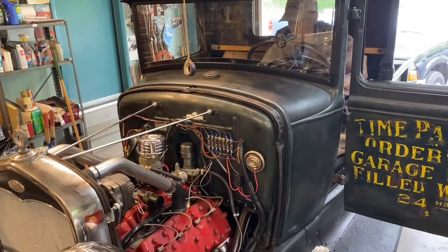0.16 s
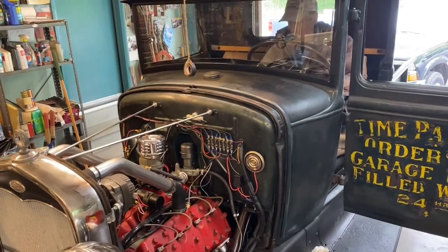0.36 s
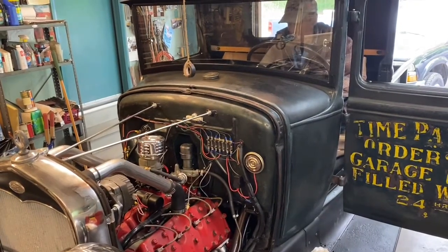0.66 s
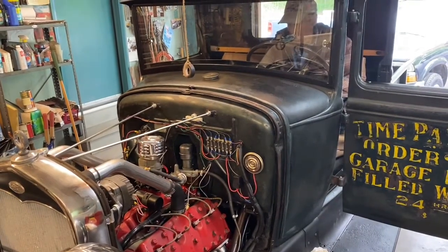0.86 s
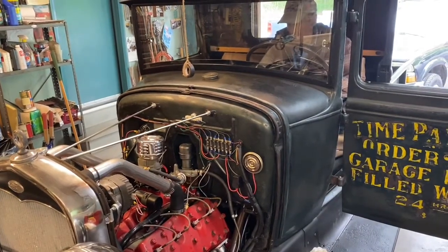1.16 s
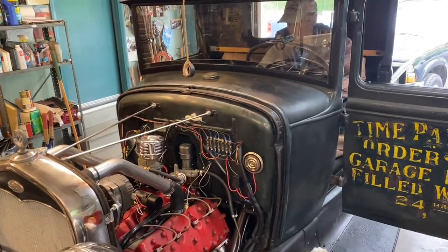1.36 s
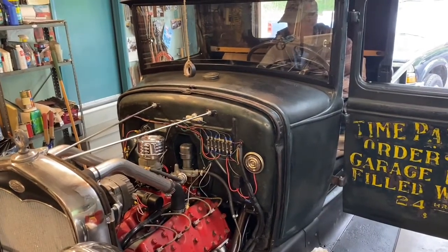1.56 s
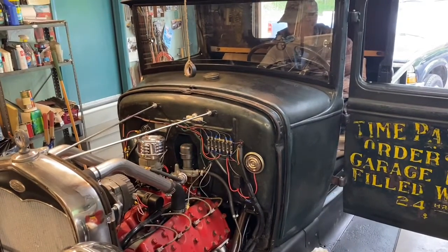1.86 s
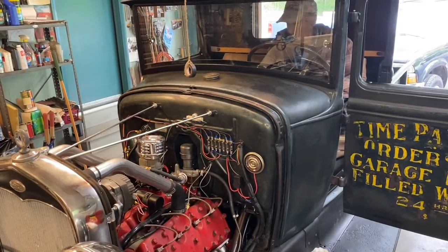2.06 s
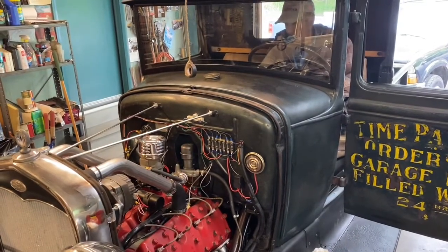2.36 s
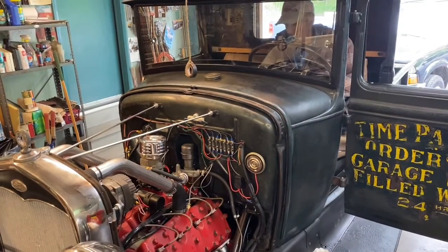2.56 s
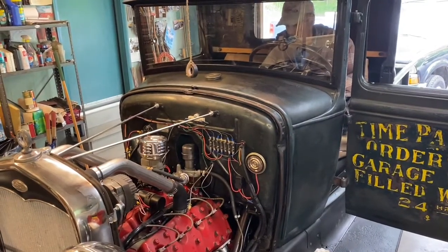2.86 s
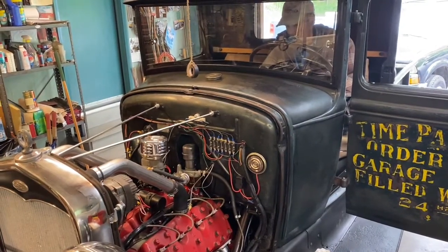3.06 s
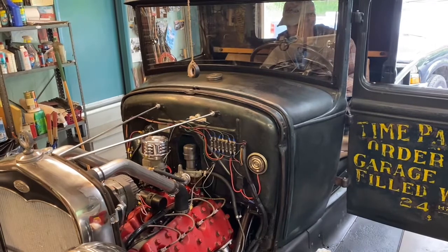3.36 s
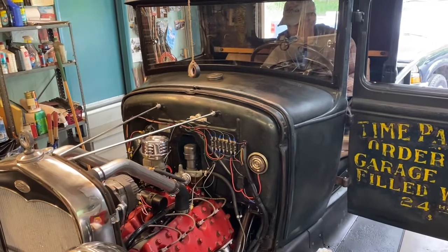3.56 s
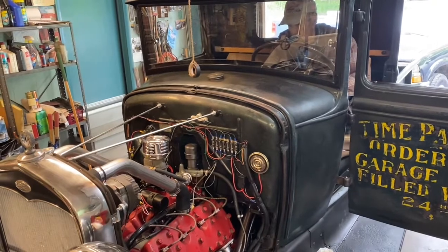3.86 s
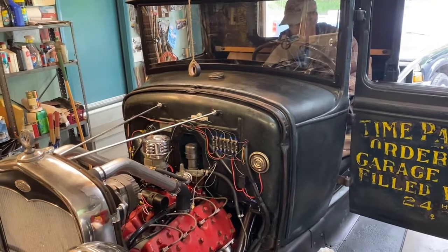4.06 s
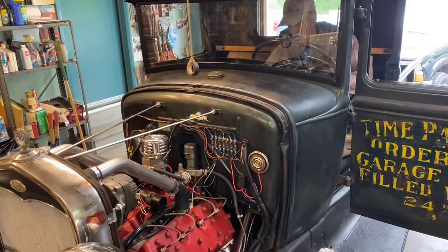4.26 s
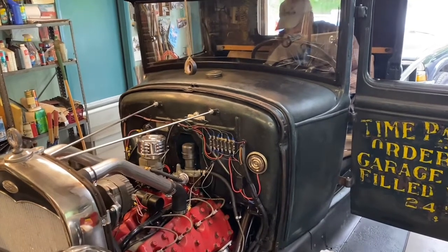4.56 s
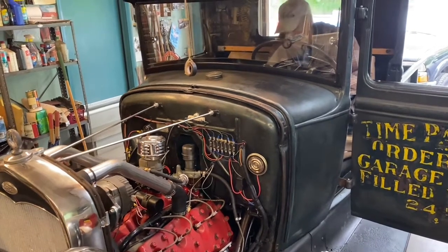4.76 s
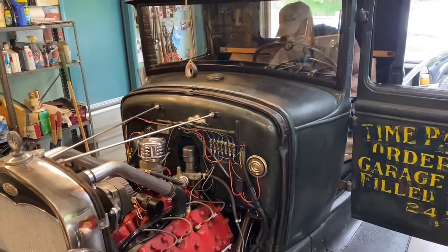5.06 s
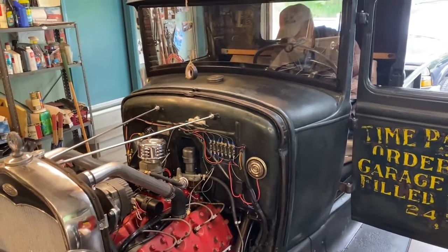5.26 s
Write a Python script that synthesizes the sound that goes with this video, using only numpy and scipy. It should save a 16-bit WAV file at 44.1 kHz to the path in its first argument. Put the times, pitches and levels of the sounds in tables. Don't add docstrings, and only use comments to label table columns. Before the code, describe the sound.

Close stereo pickup in a home garage: faint key ticks and soft pedal thumps over quiet air, then at one and a half seconds a hard starter clunk and brief toothy grinding. An old V8 catches, lurches through slow uneven firings, revs with a throaty exhaust and hissing intake, then drops to a lumpy idle with light metallic clatter.

```python
import sys
import numpy as np
from scipy import signal
from scipy.fft import rfft, irfft, next_fast_len
from scipy.io import wavfile
from scipy.ndimage import uniform_filter1d, map_coordinates

SR = 44100
rng = np.random.default_rng(int(sys.argv[2]) if len(sys.argv) > 2 else 0)


def boost_factor(decibels):
    exponent = np.asarray(decibels, float) / 20
    return 10 ** exponent


def unload_wav(signal):
    wavfile.write(
        sys.argv[1],
        SR,
        np.round(np.clip(np.atleast_2d(signal).T, -1, 1) * 32767).astype(np.int16),
    )


N = 238250
TIME = np.arange(N) / SR

# pitch_hz, level_db (per Hz)
STILL_AIR = [(15, -40), (25, -36), (54, 2), (323, -21), (364, -4.5), (392, -38), (868, -23), (980, -20.5),
             (3610, -48), (3880, -64), (4590, -27.5), (5180, -61), (8000, -60), (10400, -95), (17600, -120)]
# pitch_hz, width_hz, level_db
MACHINE_HUM = [(356, 2.8, -75), (4680, 250, -78)]
# start_s, peak_db, pitch_hz, fade_s (time to fall 60 dB)
KEY_TICKS = [(0.156, -62, 2040, 0.18), (0.1875, -56, 2190, 0.17), (0.2867, -57.5, 2160, 0.19),
             (0.3606, -50, 2290, 0.14), (0.3914, -67, 2190, 0.3), (0.4144, -60, 2180, 0.22)]
# time_s, rumble_db, linkage_rustle_db
PEDAL_MOVES = [(0.12, -78, -89), (0.202, -63, -72), (0.276, -54, -81), (0.284, -66, -76), (0.352, -59, -82),
               (0.36, -55, -59), (0.39, -53, -75), (0.488, -62, -104), (0.562, -58, -92), (0.582, -81, -87),
               (0.65, -63, -86), (0.758, -70, -88), (0.788, -57, -53.5), (0.818, -39, -46.5),
               (0.872, -48, -57.5), (1.07, -50, -60), (1.146, -58, -80), (1.198, -59, -61.5),
               (1.454, -81, -84), (1.47, -76, -61)]
# start_s, peak_db, pitch_hz, fade_s
METAL_CLICKS = [(0.7836, -40.5, 5140, 0.27), (1.1815, -35, 7100, 0.25), (1.486, -36, 5600, 0.067),
                (1.5314, -17.5, 6420, 0.15), (1.7186, -15, 5480, 0.063), (1.7604, -18, 4850, 0.09),
                (1.8407, -19, 6270, 0.1), (1.9108, -18, 7200, 0.12), (1.9612, -14, 5070, 0.052),
                (1.985, -19.5, 6080, 0.18), (2.0855, -10, 5350, 0.068), (2.124, -18, 6800, 0.098),
                (2.493, -28, 4680, 0.09), (2.6302, -24, 4427, 0.083), (2.9353, -22.5, 4640, 0.12),
                (2.9596, -15, 7040, 0.2), (3.047, -17, 6270, 0.09), (4.116, -22, 4422, 0.09),
                (4.2798, -20, 4730, 0.094), (4.3493, -31, 6900, 0.09), (5.0424, -40, 4830, 0.091),
                (5.2329, -30, 6710, 0.075)]
# start_s, peak_db, pitch_hz, fade_s
HEAVY_KNOCKS = [
    (0.802, -55, 641, 0.16),
    (1.495, -17, 570, 0.31),
    (1.533, -9.5, 650, 0.2),
    (1.54, -2.5, 820, 0.1),
    (2.989, -19, 699, 0.11),
    (4.88, -18.5, 444, 0.13),
]
# start_s, peak_db, pitch_hz, fade_s
SOLENOID_SNAPS = [
    (0.7834, -49, 9000, 0.05),
    (1.1827, -47, 9000, 0.042),
    (1.487, -19.5, 9000, 0.065),
]
# time_s, tooth_pitch_hz, grind_db, nose_ring_db, brush_hiss_db, groan_db
STARTER_STAGES = [
    [(1.49, 811, -19.5, -27, -24, -41), (1.516, 809, -29, -22.5, -31, -30),
     (1.53, 884, -20.5, -22, -28, -30)],
    [(1.535, 831.6, -14, -26, -27, -37), (1.593, 868.3, -19, -24, -35, -25),
     (1.683, 954.8, -17, -24, -31.5, -34), (1.725, 852.4, -18.5, -29, -29.5, -31),
     (1.777, 953.7, -14.5, -25, -29.5, -25.5), (1.867, 846, -21, -30, -31, -30),
     (1.885, 903.2, -28, -37, -39, -25.5), (1.931, 782.7, -38, -38, -47, -20),
     (1.96, 890, -39, -32, -43, -22)],
]
# pitch_hz, width_hz, level_db
HOUSING_RINGS = [(440, 46, -7.5), (862, 35, 0.5), (931, 50, -0.5), (1256, 20, 2), (1423, 40, -4),
                 (1650, 28, -5.5), (1802, 21, -2.5), (2056, 53, -8.5), (2380, 60, -12), (2870, 170, -21),
                 (3420, 220, -21.5)]
# pitch_hz, width_hz, level_db
NOSE_RING = [(656, 29, 0)]
# time_s, cycles_hz, firing_db, fifth_order_db, third_order_db, second_harmonic_db, pipe_bark_db
ENGINE_RUN = [(1.86, 7.7, -26, -42, -50, -48, -35), (1.94, 8.9, -14.5, -34, -49, -31, -27),
              (2.0, 9.2, -22, -41, -55, -28, -19.5), (2.07, 9.1, -15, -38, -47, -40, -21.5),
              (2.1, 8.74, -32, -38, -50, -32, -21.5), (2.15, 5.7, -7.5, -40, -46, -29, -20),
              (2.2, 7, -24, -32, -45, -27, -20), (2.24, 7.5, -12.5, -47, -54, -22, -20),
              (2.26, 8.5, -18, -34, -49, -43, -21.5), (2.33, 8.5, -13, -36, -53, -22, -22),
              (2.38, 7.6, -13, -44, -48, -33, -19.5), (2.4, 8.3, -24, -33, -53, -41, -25.5),
              (2.46, 6.9, -12, -34, -46, -37, -18), (2.5, 6.45, -21.5, -46, -56, -38, -24),
              (2.64, 6.33, -17, -48, -48, -40, -27.5), (2.71, 5.56, -11, -50, -47, -27, -21.5),
              (2.81, 6.2, -23, -49, -52, -39, -23), (2.85, 6.37, -23, -41, -46, -21, -21.5),
              (2.9, 7.4, -15.5, -39, -48, -36, -23), (2.97, 7.87, -15, -31, -52, -39, -12),
              (3.11, 10.44, -10.5, -7, -39, -34, -12.5), (3.16, 11.34, -14, -13, -31, -26, -13.5),
              (3.28, 12, -17, -23, -49, -36, -16), (3.37, 11.85, -19, -26, -26, -31, -12.5),
              (3.46, 12.4, -25, -24, -34, -32, -11), (3.56, 15.6, -33, -14.5, -18, -22, -11),
              (3.64, 15.8, -23, -15, -16, -30, -17.5), (3.73, 16.3, -30, -16, -14, -49, -23),
              (3.93, 13.8, -32, -33, -19, -38, -17.5), (4.06, 11.7, -30, -22, -42, -24, -19),
              (4.27, 10.54, -26, -19, -39, -39, -20.5), (4.43, 10.36, -21.5, -15.5, -40, -25.5, -18.5),
              (4.56, 9.1, -16.5, -18, -51, -32, -23.5), (4.72, 9.4, -13.5, -17.5, -46, -28, -23),
              (4.93, 9.2, -25.5, -20, -57, -38, -17.5), (4.99, 9.36, -22, -16, -49, -32, -24),
              (5.32, 9.4, -16.5, -23, -53, -28.5, -24), (5.36, 7.8, -16, -26, -51, -29, -24.5),
              (5.4, 9.7, -38, -37, -35, -24, -21)]
# time_s, block_clatter_db, bodywork_drone_db, intake_hiss_db
ENGINE_NOISE = [(1.84, -21, -26, -26), (1.86, -18, -26, -45), (1.88, -32, -27, -35),
                (1.93, -34.5, -38, -34.5), (2.01, -33, -38, -31.5), (2.04, -36, -28, -33.5),
                (2.14, -31, -28, -31), (2.19, -32.5, -30, -31.5), (2.45, -30.5, -31, -33),
                (2.59, -32, -32.5, -35.5), (2.79, -32, -33, -34), (2.84, -31.5, -41, -33.5),
                (2.88, -31, -27, -33.5), (2.91, -31.5, -33, -33.5), (2.94, -25, -22, -29),
                (3.0, -26.5, -20, -27), (3.04, -29.5, -31, -27), (3.08, -21, -23, -26),
                (3.13, -28, -29, -28), (3.36, -26.5, -33.5, -27), (3.4, -22, -18, -26),
                (3.44, -22, -22, -23), (3.56, -24.5, -16, -23.5), (3.64, -27.5, -29, -27),
                (3.78, -26, -33.5, -30), (3.85, -29.5, -35, -29.5), (3.89, -30, -32.5, -31),
                (4.21, -30, -40, -32.5), (4.47, -30, -35.5, -33), (4.5, -32, -41, -32),
                (4.71, -31, -41, -32.5), (4.85, -31, -49, -33.5), (4.88, -28, -27, -32.5),
                (4.96, -31.5, -35.5, -33.5), (5.38, -31.5, -41, -33), (5.4, -29, -41, -32)]
FIRING_STRENGTH = [-4, -10, -1, -7, -6.5, 0.5, -6.5, -4.5]
# pitch_hz, width_hz, level_db
PIPE_RINGS = [(138, 21.7, 0), (197.6, 20.8, 1.5), (247.5, 17, 2.5), (275.5, 18.3, -4.5), (320, 17.6, -4),
              (416, 15.6, -16.5), (454, 8.3, -8.5), (568, 34, -23), (657, 47, -22.5)]
# pitch_hz, width_hz, level_db
AIR_BOOM = [(47, 5.2, -2.5), (72.5, 9.6, -1), (87.4, 18.5, -5.5), (101.6, 8, -1.5)]

# pitch_hz, level_db (per Hz)
RUMBLE_COLOUR = [(25, -46), (38, 2.5), (48, -6.5), (75, 0), (100, 2.5), (125, -6.5), (200, -47.5)]
THUMP_COLOUR = [(50, 0.5), (110, -8.5), (200, -2.5), (350, -9), (700, -15), (1500, -49)]
BODYWORK_COLOUR = [(250, -27), (420, 0.5), (560, -1), (700, -3.5), (850, -7.5), (1300, -31)]
CLATTER_COLOUR = [(400, -14), (750, -7), (1300, -3.5), (2000, -6.5), (2800, -17), (4000, -22.5),
                  (6000, -48)]
HISS_COLOUR = [(1500, -10), (2800, 2), (3900, -0.5), (4800, 2), (6500, -3), (8000, -2), (11000, -7.5),
               (14000, -9), (16000, -17)]
RUSTLE_COLOUR = [(500, 0), (1200, -1), (2300, -5), (3500, -9), (6000, -26), (8000, -25), (15000, -44)]

# pitch_hz, fade_s
WALL_FADE = [(60, 1), (500, 0.41), (3000, 0.25), (10000, 0.033)]
# pitch_hz, likeness (1 = the same)
PORT_LIKENESS = [(60, 1), (200, 0.97), (500, 0.74), (1300, 0.73), (3000, 0.7), (5500, 0.4), (6800, 1),
                 (16000, 1)]
# pitch_hz, level_db
PORT_LEAN = [(60, 0.5), (110, -0.5), (200, -1.5), (380, -2), (700, 1), (1290, -2), (2380, 2), (4400, 3.5),
             (8120, 0.0), (15000, 1)]
# pitch_hz, lead_rad
PORT_LEAD = [(100, 0.24), (780, 0.57), (1290, 1.57), (2150, 0.88), (3100, 0.68), (6500, 0.018)]
# from_hz, hz_per_half_wave
PORT_DRIFT = (6880, 2133)


def unit(x):
    return x / np.sqrt(np.mean(x ** 2) + 1e-20)


def along(points, hz):
    f, v = np.transpose(points)
    return np.interp(np.log(hz + 1), np.log(f + 1), v)


def curves(rows):
    s, *cols = np.transpose(rows)
    edge_s = np.minimum(TIME - s[0], s[-1] + 0.0285 - TIME)
    gate = np.clip(edge_s / 0.002, 0, 1)
    return [np.interp(TIME, s, c) for c in cols] + [gate]


def wobble(rate):
    knots = rng.standard_normal(int(N * rate / SR) + 4)
    return map_coordinates(knots, [TIME * rate])


def filtered(x, response):
    m = next_fast_len(N + SR // 2)
    return irfft(rfft(x, m) * response(np.fft.rfftfreq(m, 1 / SR)), m)[..., :N]


def resonant(x, modes):
    def response(f):
        total = 0
        for k, (centre, width, db) in enumerate(modes):
            ring = 1j * f * width / (centre * centre - f * f + 1j * f * width)
            total = total + (-1) ** k * boost_factor(db) * ring
        return total
    return filtered(x, response)


def rush(spectrum, patchy_db):
    z = signal.stft(rng.standard_normal(N), nperseg=512)[2]
    patches = uniform_filter1d(rng.standard_normal(z.shape), 8, 0)
    patches = unit(uniform_filter1d(patches, 6, 1))
    x = signal.istft(z * boost_factor(patchy_db * patches), nperseg=512)[1][:N]
    return unit(filtered(x, lambda hz: boost_factor(along(spectrum, hz))))


def hits(rows, spread, gain_db):
    out, t = np.zeros(N + SR), np.arange(SR // 3) / SR
    f = np.fft.rfftfreq(len(t), 1 / SR)
    for s, db, hz, t60 in rows:
        colour = 1 / (1 + ((f - hz) / (spread * hz)) ** 2)
        ring = unit(irfft(rfft(rng.standard_normal(len(t))) * colour, len(t)))
        fade = boost_factor(db + gain_db - 60 * t / max(t60, 0.01))
        out[round(s * SR):][:len(t)] += fade * ring * np.minimum(t / 0.00058, 1)
    return out[:N]


def garage():
    air = boost_factor(-52 + 1.8 * wobble(6.2)) * rush(STILL_AIR, patchy_db=3.0)
    for hz, width, db in MACHINE_HUM:
        mode = [(hz, width, 0)]
        hum = resonant(resonant(rng.standard_normal(N), mode), mode)
        air = air + boost_factor(db) * unit(hum)
    return air


def keys():
    out, t = np.zeros(N), np.arange(SR // 3) / SR
    for s, db, hz, t60 in KEY_TICKS:
        turn = 2 * np.pi * hz * t
        ring = np.sin(turn) + 0.49 * np.sin(1.055 * turn) + 0.46 * np.sin(0.45 * turn)
        out[round(s * SR):][:len(t)] += boost_factor(db - 2 - 60 * t / t60) * ring * np.minimum(t / 0.0006, 1)
    return out * boost_factor(3 * wobble(123.5)) + hits(KEY_TICKS, spread=0.05, gain_db=-11)


def pedal():
    thump_db, rustle_db, moving = curves(PEDAL_MOVES)
    thump = boost_factor(thump_db) * rush(THUMP_COLOUR, patchy_db=2)
    rustle = boost_factor(rustle_db + 4.5) * rush(RUSTLE_COLOUR, patchy_db=1.5)
    return moving * (thump + rustle)


def metal():
    clicks = hits(METAL_CLICKS, spread=0.24, gain_db=-9.5)
    knocks = hits(HEAVY_KNOCKS, spread=0.34, gain_db=-2.5)
    snaps = hits(SOLENOID_SNAPS, spread=2.2, gain_db=-1)
    return clicks + knocks + snaps


def starter():
    tooth_hz, grind_db, nose_db, hiss_db, groan_db, turning = curves(np.vstack(STARTER_STAGES))
    mesh = 2 * np.pi * np.cumsum(tooth_hz * (1 + 0.0112 * wobble(60))) / SR
    teeth = rng.standard_normal(N) * boost_factor(1.5 * wobble(60))
    whine = boost_factor(-5 + 4 * wobble(30)) * (np.sin(mesh) + 0.3 * np.sin(2 * mesh))
    housing = unit(resonant(teeth, HOUSING_RINGS))
    grind = boost_factor(grind_db) * unit(housing + whine + 0.47 * rush(CLATTER_COLOUR, patchy_db=-2.0))
    nose = boost_factor(nose_db + 0.5) * unit(resonant(teeth, NOSE_RING))
    low_noise = rush(THUMP_COLOUR, patchy_db=1.5) + 0.6 * rush(RUMBLE_COLOUR, patchy_db=1.5)
    groan = boost_factor(groan_db) * unit(low_noise)
    brushes = boost_factor(hiss_db) * rush(HISS_COLOUR, patchy_db=3.8)
    return turning * (grind + nose + groan + brushes)


def firing_pulses(turn, cycles):
    at = np.flatnonzero(np.diff(np.floor(8 * turn)))
    luck = rng.standard_normal((len(at), 2))
    shifted = np.clip(at + (0.0009 * SR * luck[:, 0]).astype(int), 0, N - 1)
    strength_db = np.resize(FIRING_STRENGTH, len(at)) + 2.8 * luck[:, 1]
    pulses = np.zeros(N)
    pulses[shifted] = boost_factor(strength_db) / np.sqrt(cycles[at])
    return pulses


def engine():
    cycles, firing_db, fifth_db, third_db, second_db, bark_db, running = curves(ENGINE_RUN)
    clatter_db, body_db, hiss_db, _ = curves(ENGINE_NOISE)
    turn = np.cumsum(cycles * (1 + 0.012 * wobble(9))) / SR

    tones = np.zeros(N)
    for order, db in ((8, firing_db), (5, fifth_db), (3, third_db), (16, second_db)):
        tones += np.sqrt(2) * boost_factor(db + 0.5 * wobble(14)) * np.sin(2 * np.pi * order * turn)
    slow = np.clip((9.5 - cycles) / 1.5, 0, 1)
    lope = 1 + 1.1 * slow * np.sin(4 * np.pi * turn + 1.6 * wobble(5))

    pulses = firing_pulses(turn, cycles)
    puff_fade = boost_factor(-60 * np.arange(2000) / SR / 0.09)
    puff = signal.fftconvolve(pulses, puff_fade)[:N]
    turbulence = unit(rng.standard_normal(N) * (puff + 0.1 * puff.mean()))
    bark = boost_factor(bark_db) * unit(resonant(unit(pulses) + 0.84 * turbulence, PIPE_RINGS))
    boom = boost_factor(bark_db - 3.5) * unit(resonant(unit(pulses) + 0.7 * turbulence, AIR_BOOM))

    beat = unit(puff)
    clatter = unit((1 + 0.25 * beat) * rush(CLATTER_COLOUR, patchy_db=1.5))
    clatter = boost_factor(clatter_db + 0.69 * wobble(20)) * clatter
    body = boost_factor(body_db - 1.5) * unit((1 + 0.39 * beat) * rush(BODYWORK_COLOUR, patchy_db=1.5))
    hiss = unit((1 + 0.63 * beat) * rush(HISS_COLOUR, patchy_db=1.0))
    hiss = boost_factor(hiss_db + 0.89 * wobble(25)) * hiss
    return running * (lope * tones + bark + boom + body + clatter + hiss)


def walls(x):
    hz, t, z = signal.stft(rng.standard_normal((2, SR // 3)), SR, nperseg=256)
    t60 = along(WALL_FADE, hz)[:, None]
    tail = signal.istft(z * boost_factor(-60 * t / t60) / np.sqrt(t60), SR, nperseg=256)[1]
    tail = tail / np.linalg.norm(tail[0])
    return signal.fftconvolve(x[None], tail, axes=1)[:, :N]


def scene():
    dry = garage() + keys() + pedal() + metal() + starter() + engine()
    echo, scattered = walls(dry)
    echo = filtered(echo, lambda hz: (1j * hz / (300 + 1j * hz)) ** 2)
    scattered = scattered * unit(wobble(14))

    def share(hz):
        angle = np.arccos(np.clip(along(PORT_LIKENESS, hz), 0, 1)) / 2
        return np.array([np.cos(angle), np.sin(angle)])

    mid, side = filtered(np.array([dry + boost_factor(-7.5) * echo, scattered]), share)
    return np.array([mid + side, mid - side])


def roll_off(x):
    return signal.sosfilt(signal.butter(12, 17080, fs=SR, output="sos"), x)


def record(dry):
    def ports(hz):
        drift = np.pi * np.maximum(hz - PORT_DRIFT[0], 0) / PORT_DRIFT[1]
        lead = along(PORT_LEAD, hz) - drift + 0.44 * np.sin(2 * drift)
        half = boost_factor(along(PORT_LEAN, hz) / 2) * np.exp(0.5j * lead)
        treble_end = np.clip((16050 - hz) / 300, 0, 1) ** 2
        bass_cut = (1j * hz / (36 + 1j * hz)) ** 2
        return treble_end * bass_cut * np.array([half, 1 / half])

    x = filtered(dry, ports)
    x = x / (1 + np.abs(x / 0.88) ** 5) ** (1 / 5)
    return roll_off(x)


dry = scene()
out = record(dry)
unload_wav(out)
```